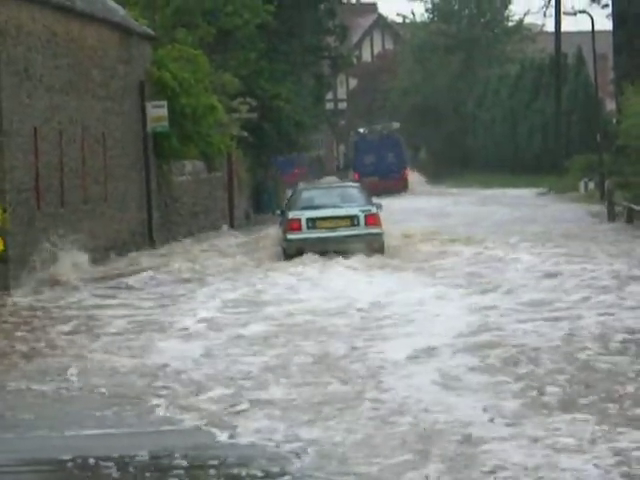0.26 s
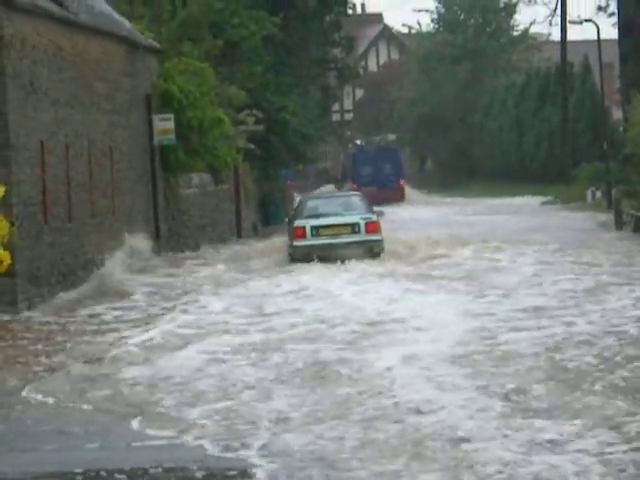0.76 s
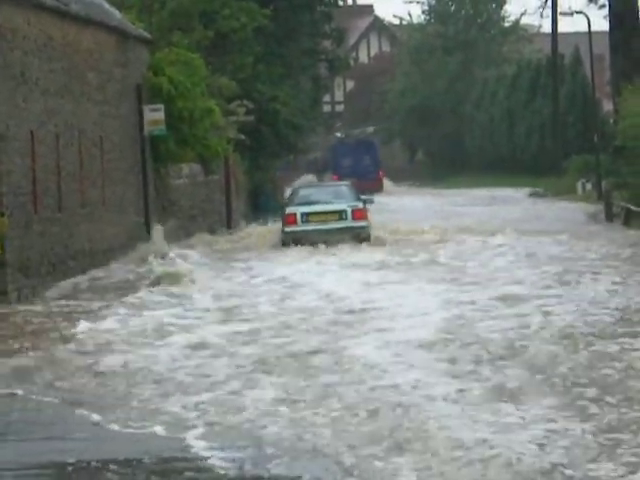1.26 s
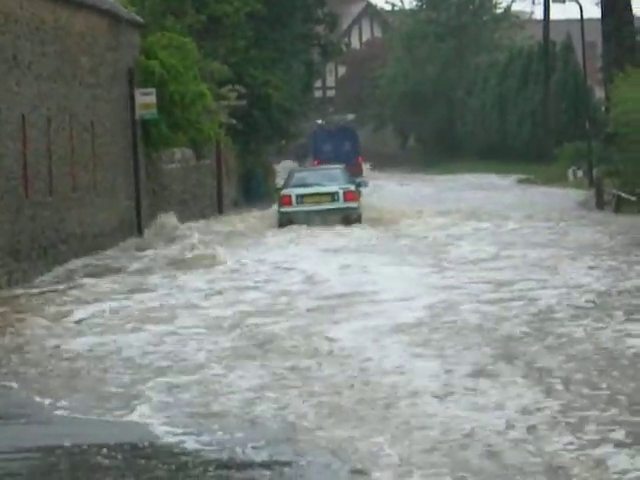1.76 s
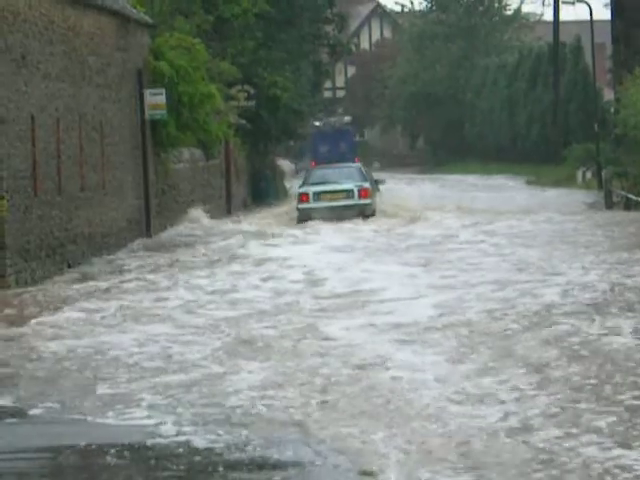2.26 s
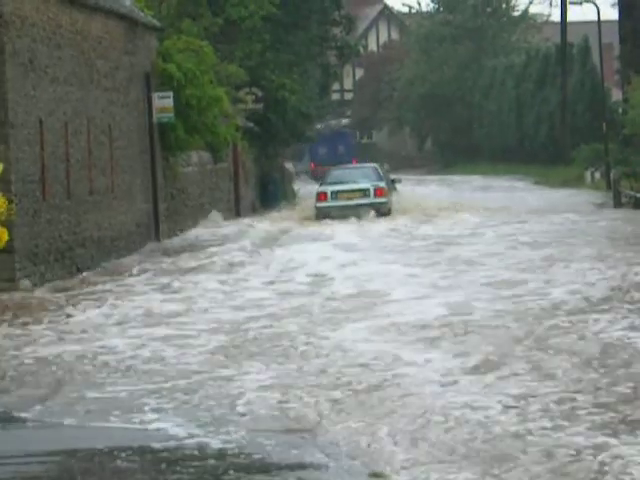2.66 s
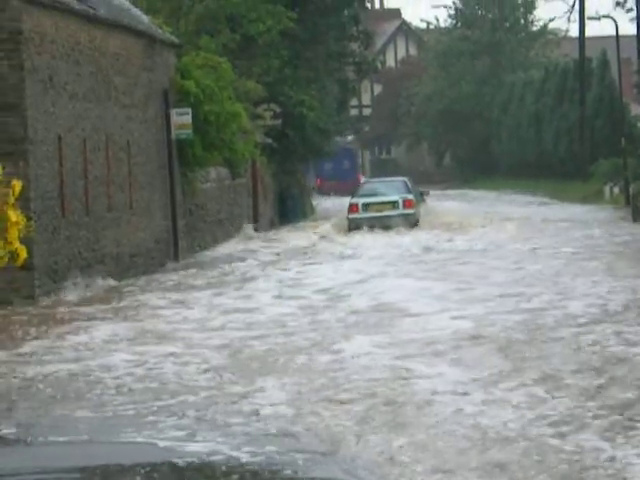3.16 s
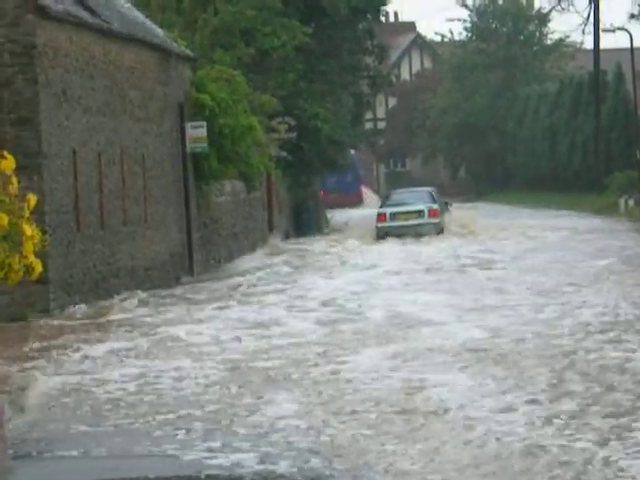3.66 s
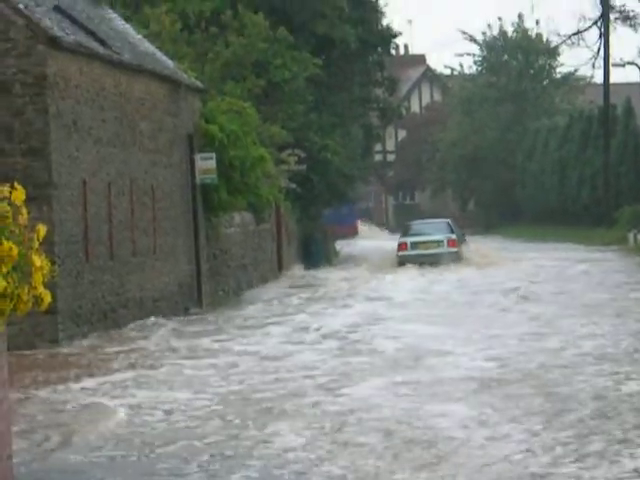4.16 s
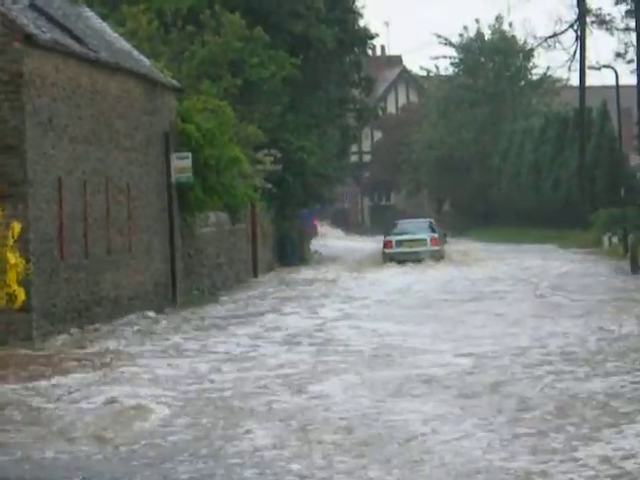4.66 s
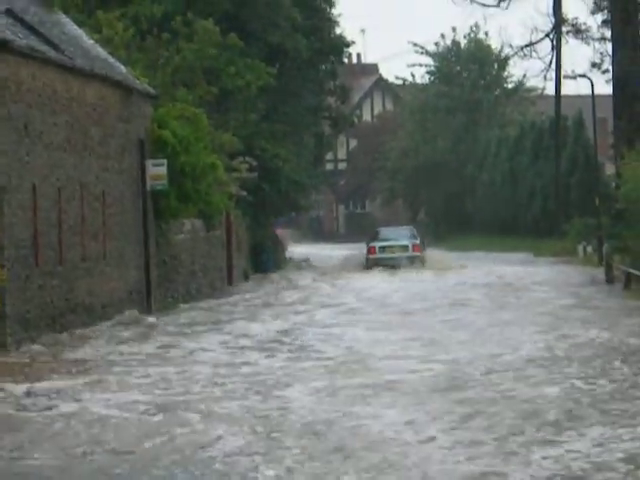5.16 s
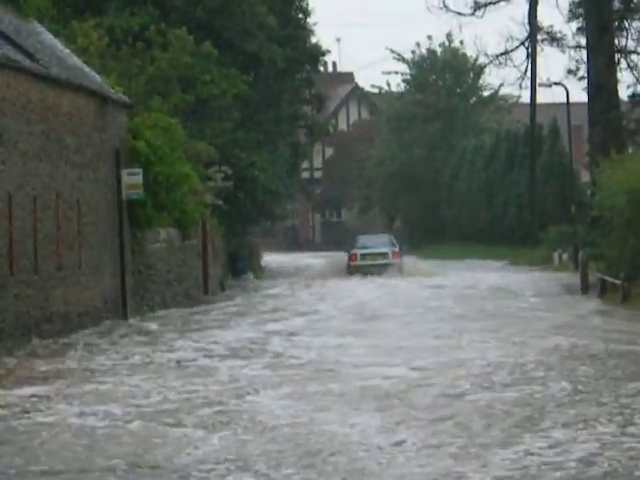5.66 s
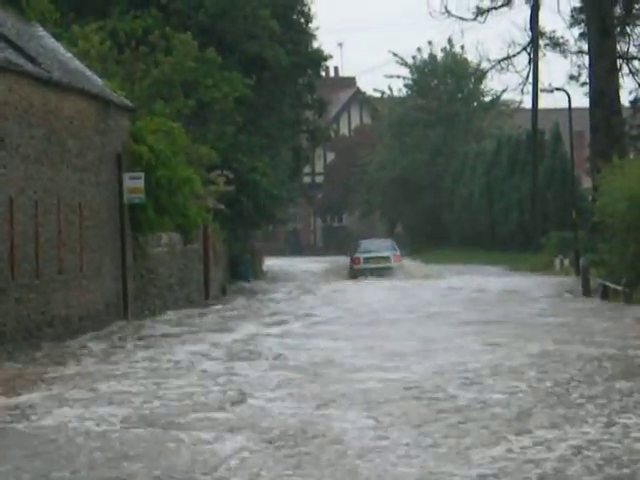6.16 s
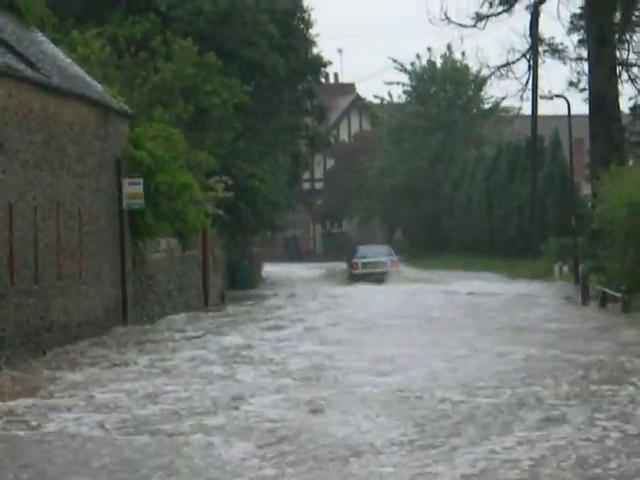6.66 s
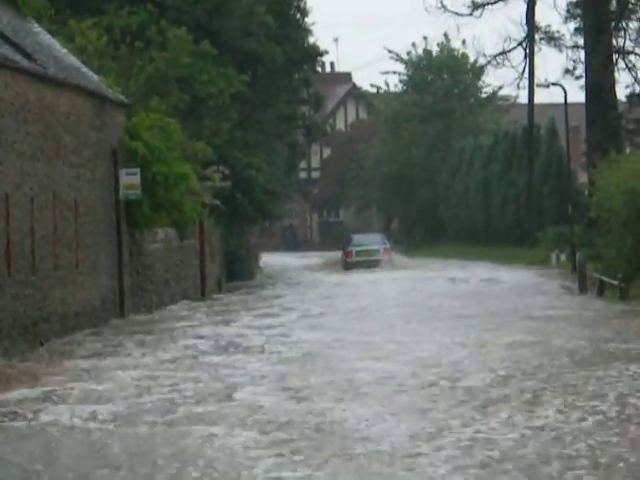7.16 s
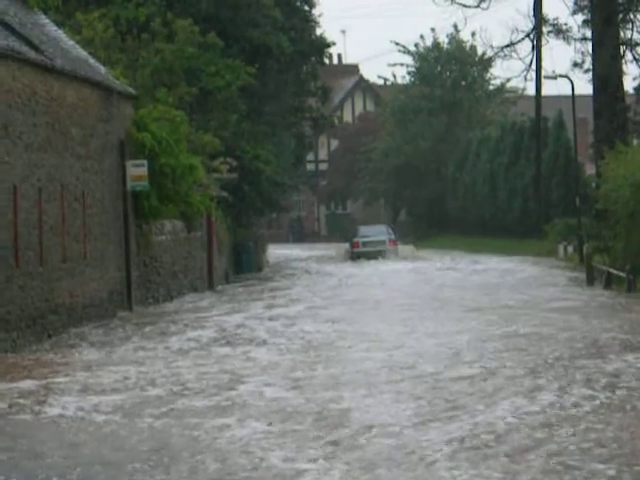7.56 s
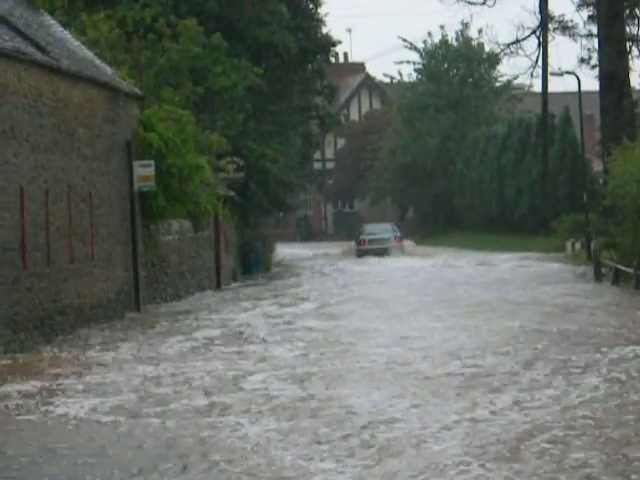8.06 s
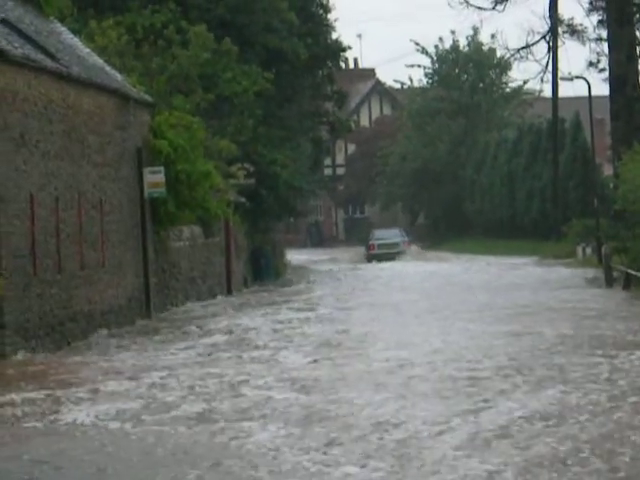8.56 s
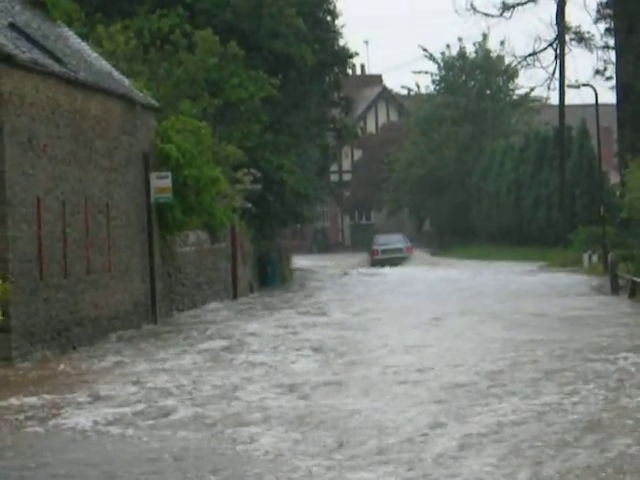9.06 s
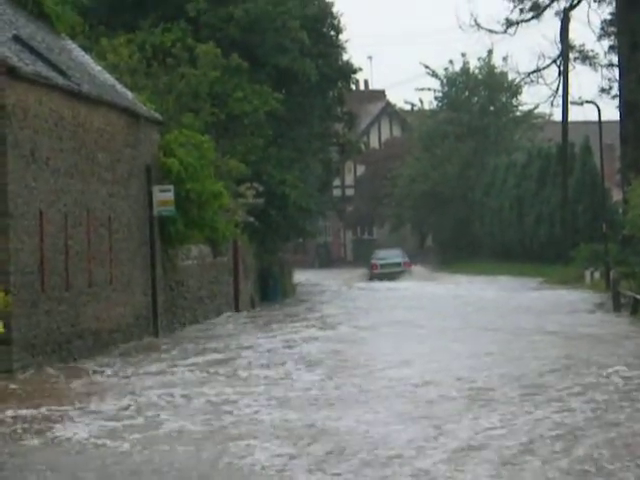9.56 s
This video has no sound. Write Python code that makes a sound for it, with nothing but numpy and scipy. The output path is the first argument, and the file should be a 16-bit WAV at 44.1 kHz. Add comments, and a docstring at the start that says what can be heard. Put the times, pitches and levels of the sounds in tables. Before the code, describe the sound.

Fast floodwater pours down a village road, a steady gurgling churn under a hiss of foam and spray. Small wave crests slap shut at irregular moments. Beneath the water a car wades away, its exhaust a low hum that wavers and fades, with other engines barely audible. The rush eases slightly toward the end. The sound is mono and dull on top, as from a small microphone.

```python
"""Car wading through floodwater

Floodwater pours down a village road: a gurgling churn under a hiss of foam and spray, made by bubbles
and swelling as wavelets break. Single crests slap shut on pockets of air. A car wades away, its wake
settling and its silencer booming; two more engines hum faintly behind the water.
A small narrow-band microphone overloads on the hardest slaps."""
import sys
import numpy as np
from scipy import signal
from scipy.fft import rfft, irfft
from scipy.io import wavfile
from scipy.ndimage import uniform_filter1d

SR = 44100
rng = np.random.default_rng(int(sys.argv[2]) if len(sys.argv) > 2 else 0)


def log_audio(samples):
    """Write samples as a 16-bit WAV file to the path given in sys.argv[1]."""
    # one column per channel
    frames = np.atleast_2d(samples).T
    # limit to full scale, then quantise
    limited = np.clip(frames, -1, 1)
    pcm = np.round(limited * 32767).astype(np.int16)
    wavfile.write(sys.argv[1], SR, pcm)


N = 433048
TIME_S = np.arange(N) / SR
FREQ_HZ = np.fft.rfftfreq(N, 1 / SR)


def gain(db):
    """Decibels to amplitude."""
    return 10 ** (np.asarray(db) / 20)


def unit_rms(x):
    """Scales to rms 1."""
    return x / np.sqrt(np.mean(x ** 2) + 1e-20)


def follow(rows):
    """Interpolates timed rows to one curve per column."""
    times_s, *columns = np.transpose(rows)
    return [np.interp(TIME_S, times_s, column) for column in columns]


def equalise(x, spectrum):
    """Filters by (Hz, dB) points joined on a log-frequency axis."""
    hz, db = np.transpose(spectrum)
    curve_db = np.interp(np.log(FREQ_HZ + 1), np.log(hz + 1), db)
    return irfft(rfft(x) * gain(curve_db), N)


def drift(rate_hz):
    """Slow random motion of rms 1, with little above rate_hz."""
    return unit_rms(irfft(rfft(rng.standard_normal(N)) / (1 + (FREQ_HZ / rate_hz) ** 4), N))


def engine(firing_hz, level_db, orders, waver=.003, flutter_db=2.0):
    """Low exhaust orders, as (multiple, dB), carry over the water and waver with the load."""
    turns = np.cumsum(firing_hz * (1 + waver * drift(rate_hz=6.4))) / SR
    hum = sum(gain(db) * np.sin(2 * np.pi * (order * turns + rng.random())) for order, db in orders)
    return np.sqrt(2) * gain(level_db + flutter_db * drift(rate_hz=5.7)) * hum


def idling_engine():
    """An engine idles nearby, strongest at twice its firing rate."""
    return engine(firing_hz=56.8, level_db=-50.5, orders=[(1, -15), (2, 2)])


# Engine pulling away. Each row: time in seconds, firing rate in Hz, level in dB.
PULL_AWAY = [(6.6, 60, -63), (7, 63, -50.5), (8.4, 73.5, -50), (9.82, 83, -62)]


def pulling_engine():
    """An engine pulls away: its hum climbs in pitch, swells and fades."""
    return engine(*follow(PULL_AWAY), orders=[(1, -2.5), (2, -8)])


# Car speeding up, then easing off. Each row: time in seconds, firing rate in Hz, hum level in dB.
CAR_DRIVE = [(0, 79.5, -38.5), (1.5, 83.3, -40.5), (2.9, 86.3, -45), (3.6, 90, -45), (4.4, 91.7, -47),
             (5.5, 87.3, -40.5), (9.82, 78.5, -51)]
# Its exhaust tone. Each row: multiple of the firing rate, relative level in dB.
EXHAUST_ORDERS = [(1, -8.5), (2, 3), (3, -8.5), (4, -3.5), (6, 2)]


def wading_car(boom_order=5, silencer_hz=453, width_hz=32, fade_db_per_s=2.0):
    """The silencer booms as one exhaust order climbs into its resonance, fading as the car leaves."""
    firing_hz, level_db = follow(CAR_DRIVE)
    detuning = 2 * (boom_order * firing_hz - silencer_hz) / width_hz
    boom_db = -17.5 - fade_db_per_s * TIME_S - 20 * np.log10(1 + detuning ** 2)
    return engine(firing_hz, level_db, EXHAUST_ORDERS + [(boom_order, boom_db - level_db)])


def far_bubbles(spectrum, patch_db, patch_frames, patch_bins):
    """Countless far bubbles merge into noise, in patches that come and go."""
    real, imag, patches = rng.standard_normal((3, N // 128 + 6, 257))
    patches = uniform_filter1d(patches, patch_frames, axis=0)
    patches = unit_rms(uniform_filter1d(patches, patch_bins, axis=1))
    frames = (real + 1j * imag) * gain(patch_db * patches)
    noise = signal.istft(frames.T, nperseg=512, noverlap=384)[1][:N]
    return unit_rms(equalise(noise, spectrum))


def bubble(hz, decay_cycles, rise):
    """A pocket of air rings down, its pitch rising as it nears the surface; peak 1."""
    turns = np.arange(0, 6 * decay_cycles, hz / SR)
    age = turns / decay_cycles
    attack = 1 - np.exp(-turns / .25)
    ring = np.sin(2 * np.pi * turns * (1 + rise * age)) * np.exp(-age) * attack
    return ring / abs(ring).max()


def near_bubbles(per_s, band_hz, decay_cycles, rise, spread_db, pitches=32):
    """Bubbles of many pitches ring at random, mostly weak, a few strong."""
    pitch, when, chance = rng.random((int(per_s * N / SR), 3)).T
    strength_db = spread_db * np.minimum(-np.log(1 - chance), 3.5)
    strength = gain(strength_db) * rng.choice([-1, 1], len(pitch))
    out = np.zeros(N)
    for k, hz in enumerate(np.geomspace(*band_hz, pitches)):
        chosen = (pitch * pitches).astype(int) == k
        impulses = np.bincount((when[chosen] * N).astype(int), strength[chosen], N)
        ring = bubble(hz, decay_cycles * rng.uniform(.6, 1.4), rise)
        out += signal.oaconvolve(impulses, ring)[:N]
    return unit_rms(out)


# Large waves. Each row: centre in seconds, length in seconds, swell of the churn in dB.
LARGE_WAVES = [(.05, .4, 1.1), (.8, .35, 1.5), (3.8, .7, .8), (7.4, .35, 1.7), (9.15, .25, 1.3),
               (9.7, .3, 1)]


def wake_levels_db(churn_fade_db_per_s=.2, foam_fade_db_per_s=.14, foam_share=.4):
    """Churn and foam settle as the car leaves, and swell as each large wave heaves up."""
    swell_db = sum(db * np.exp(-(2 * (TIME_S - centre_s) / length_s) ** 2)
                   for centre_s, length_s, db in LARGE_WAVES)
    churn_db = -17.5 - churn_fade_db_per_s * TIME_S + swell_db
    foam_db = -21.5 - foam_fade_db_per_s * TIME_S + foam_share * swell_db
    return churn_db, foam_db


# Spectra of churn and foam. Each row: frequency in Hz, relative density in dB.
CHURN_SPECTRUM = [(25, -44.5), (45, -42.5), (65, -29.5), (100, -19.5), (160, -12), (250, -6), (400, -3),
                  (520, -1.5), (660, -1), (820, -6), (1100, -14), (1600, -23), (4000, -46.5)]
FOAM_SPECTRUM = [(200, -20.5), (700, -8), (1100, -4.5), (1600, -2), (2100, 1), (2600, 0), (3200, -6),
                 (4400, -7.5)]


def torrent():
    """Churn with near gurgles in it, foam with near spray; both swell as wavelets break."""
    churn_db, foam_db = wake_levels_db()
    breaking = drift(rate_hz=18)
    churn = gain(-.09) * far_bubbles(CHURN_SPECTRUM, patch_db=.6, patch_frames=14, patch_bins=3)
    gurgle = gain(-8.5) * near_bubbles(260, band_hz=(424.7, 950), decay_cycles=3, rise=.011, spread_db=4)
    foam = gain(3.5) * far_bubbles(FOAM_SPECTRUM, patch_db=.96, patch_frames=10, patch_bins=8)
    spray = gain(-7) * near_bubbles(700, band_hz=(897, 3180), decay_cycles=1.4, rise=.023, spread_db=3)
    near, far = gain(.5 * breaking), gain(.25 * breaking)  # distant water averages out
    return gain(churn_db) * (far * churn + near * gurgle) + gain(foam_db) * (far * foam + near * spray)


def soft_crests(per_s=2, level_db=-9.5, low_hz=750, high_hz=2500, decay_cycles=1.8):
    """Smaller crests close at random times and pitches; returns rows like HARD_CRESTS."""
    draws = rng.random((int(per_s * N / SR), 2))
    return [(when * N / SR, level_db, low_hz * (high_hz / low_hz) ** pitch, decay_cycles)
            for when, pitch in draws]


# Hardest crests. Each row: start in seconds, peak in dB, pitch of the trapped air in Hz, decay in cycles.
HARD_CRESTS = [(2.1635, -3.8, 1720, .6), (2.941, -5.5, 1300, .84), (4.1658, -5, 1007, 1.1),
               (4.7, -4.3, 790, 1.6), (5.1414, -6.5, 1710, 1.8), (5.8187, .3, 1200, .44),
               (6.0508, -4, 900, .45), (7.1605, -1.6, 1840, 1.2), (7.328, -2.3, 2240, 1.9),
               (8.408, -4.5, 950, 1.2), (9.0078, -.5, 854, 1.1), (9.7263, -5.5, 1405, .96)]


def crest_slaps():
    """Each crest folds over and its pocket of air gives one short knock."""
    out = np.zeros(N)
    for start_s, peak_db, hz, decay_cycles in HARD_CRESTS + soft_crests():
        knock = gain(peak_db) * bubble(hz, decay_cycles, rise=.0042)
        span = out[round(start_s * SR):][:len(knock)]
        span += knock[:len(span)]
    return out


def scene():
    """Water in front, engines behind; mono."""
    water = torrent() + crest_slaps()
    engines = wading_car() + idling_engine() + pulling_engine()
    return (water + engines)[None]


# Microphone response. Each row: frequency in Hz, gain in dB.
MIC_RESPONSE = [(20, -14.5), (45, -10.5), (75, -2.5), (3000, 0.5), (3300, 0), (3600, -6), (3900, -13),
                (4200, -23), (4400, -35), (4600, -63.5), (4900, -94.5)]


def record(dry):
    """A narrow-band microphone with a small offset, hard overload, then a low-pass."""
    offset, full_scale, cutoff_hz = -.02, .7, 15800
    clipped = np.clip(equalise(dry[0], MIC_RESPONSE) + offset, -full_scale, full_scale)
    lowpass = signal.firwin(511, cutoff_hz, window=("kaiser", 9), fs=SR)
    return signal.oaconvolve(clipped, lowpass, "same")[None]


dry = scene()
out = record(dry)
log_audio(out)
```